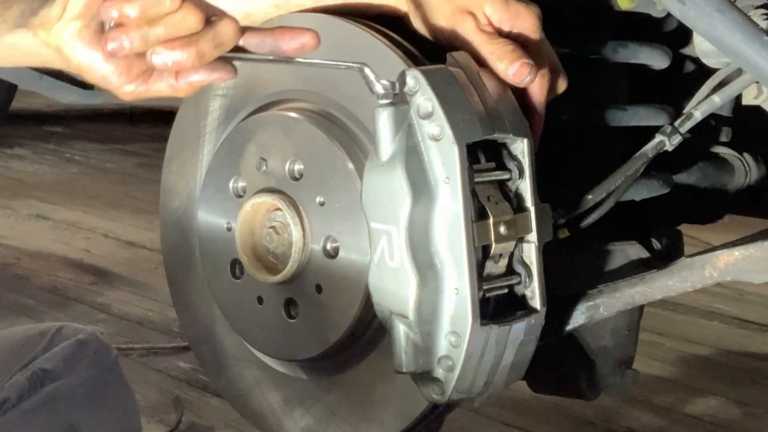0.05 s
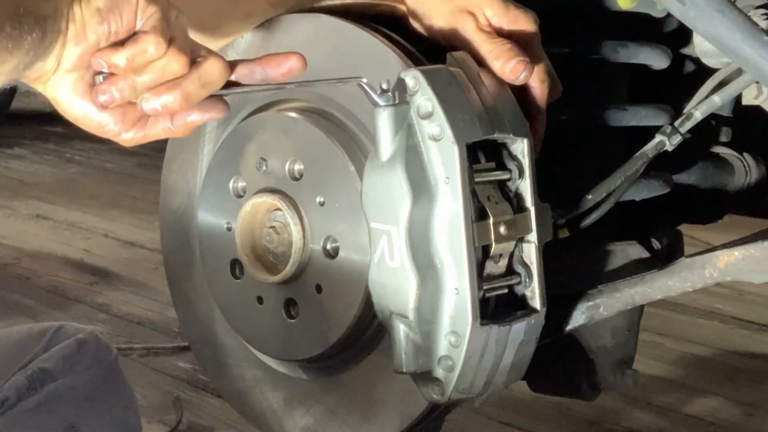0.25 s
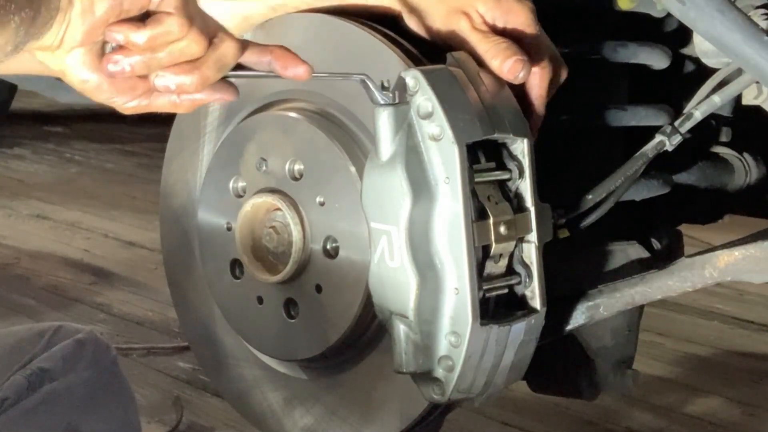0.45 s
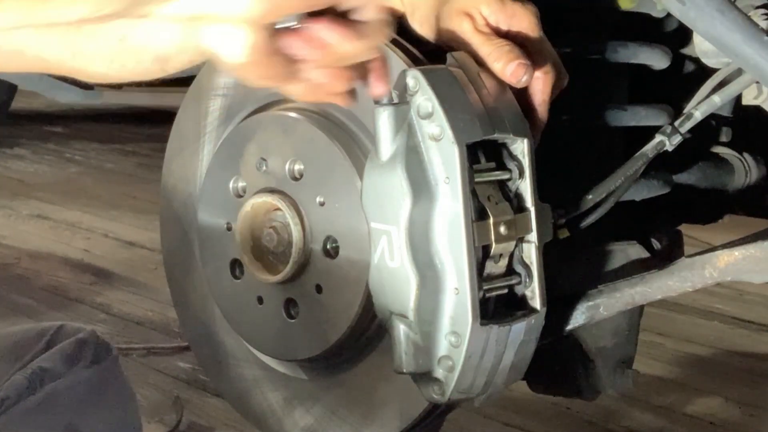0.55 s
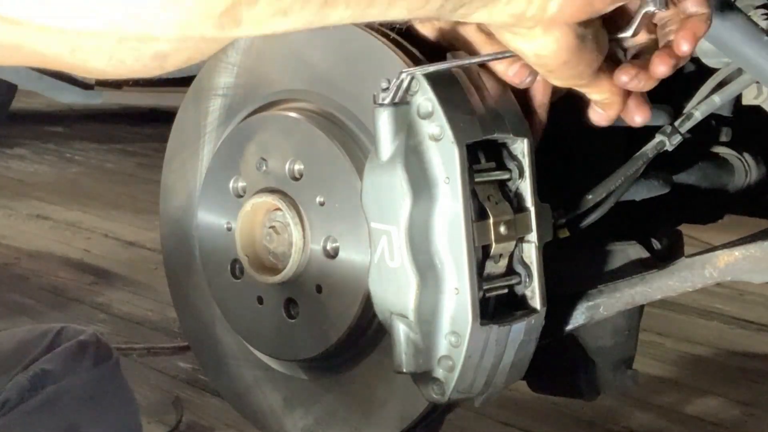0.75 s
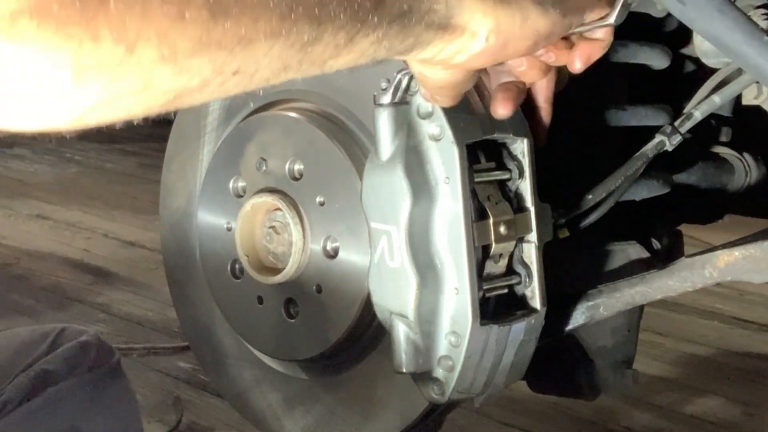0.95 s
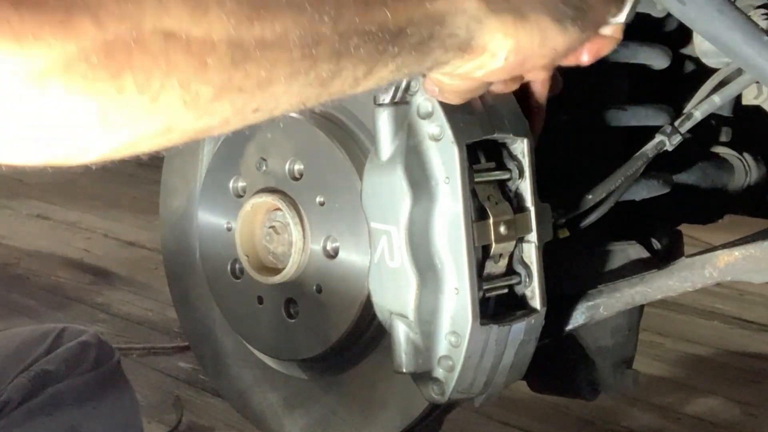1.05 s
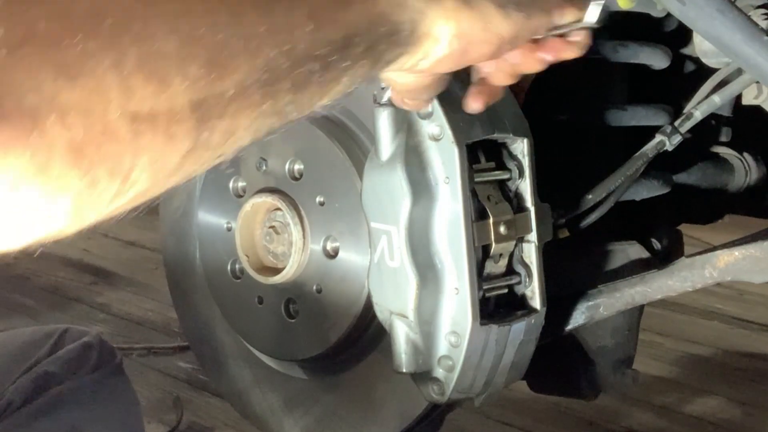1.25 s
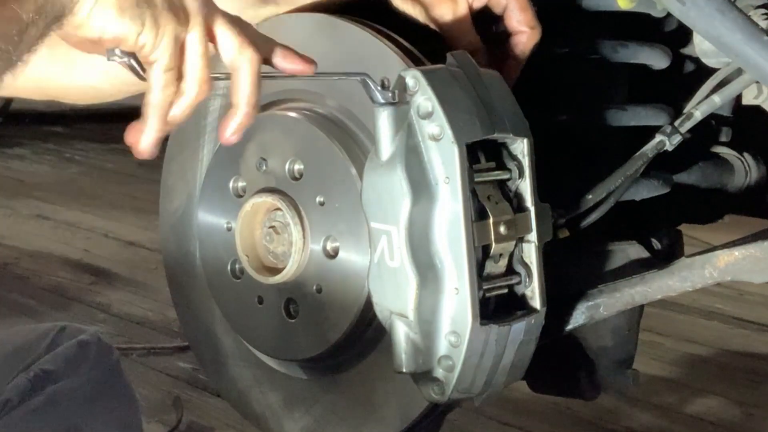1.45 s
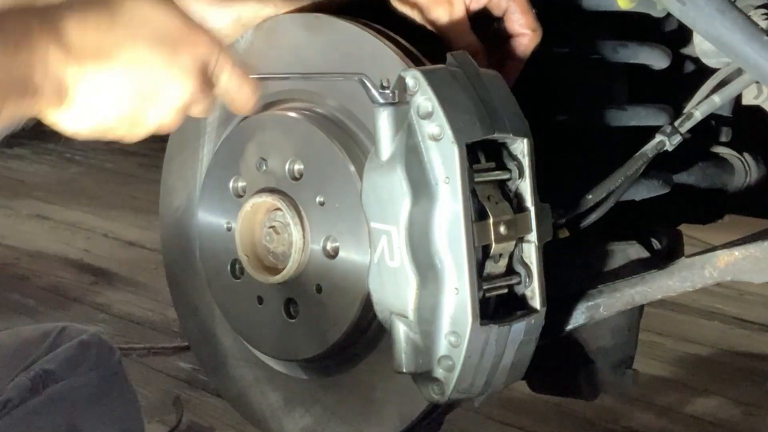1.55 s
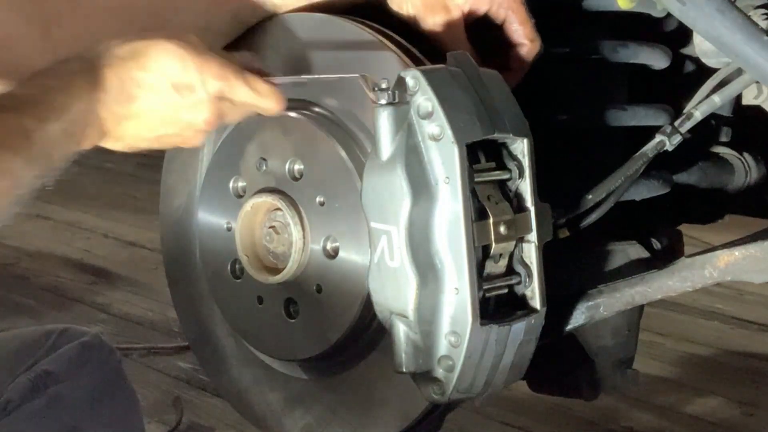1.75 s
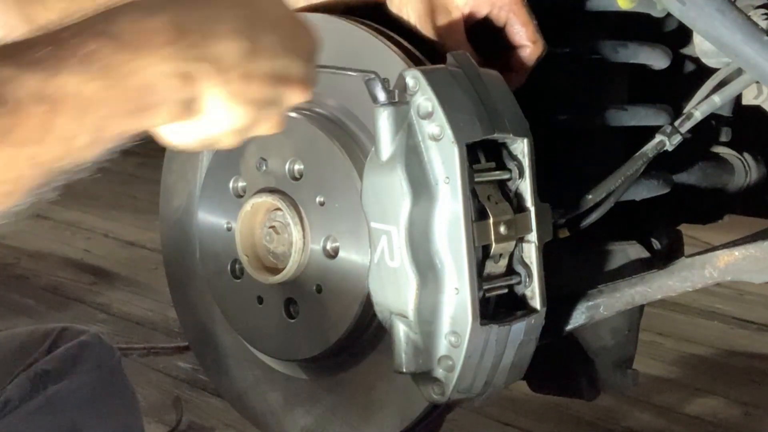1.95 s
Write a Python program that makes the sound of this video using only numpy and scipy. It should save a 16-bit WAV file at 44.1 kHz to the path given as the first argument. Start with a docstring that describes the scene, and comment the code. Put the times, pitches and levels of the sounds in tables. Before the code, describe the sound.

A wrench snaps on a brake caliper bolt at 0.23 s: a weak lead-in, a loud dry bright crack and two bounces within milliseconds, with a slight dull knock and short workshop echo. A faint tick precedes it at 0.06 s. Soft ticks follow at 0.32, tiny squeaks at 0.5-0.64, barely audible scrapes at 0.85 and 1.33, and a tick with squeak at 1.78. Low wavering hum, rumble and thin hiss continue throughout.

```python
"""A machine hum over room rumble and thin hiss comes first, then a faint tick of steel close to the microphone.
In a workshop, a steel wrench on a bolt of a car's brake caliper snaps after a weak lead-in and bounces twice.
Light ticks, scrapes and short squeaks surround the snap. Decaying partials and noise make the snap, filtered
noise the touches, uneven stick-slip pulses the squeaks, wavering sines the hum and shaped noise the air.
Arch and workshop echoes follow the wrench; the recorder rounds peaks and limits the band."""
import sys
import numpy as np
from scipy import signal
from scipy.fft import rfft, irfft
from scipy.io import wavfile
from scipy.ndimage import uniform_filter1d

SR = 44100
rng = np.random.default_rng(int(sys.argv[2]) if len(sys.argv) > 2 else 0)


def transcribe(signal):
    """Save signal, clipped to [-1, 1], as a 16-bit WAV file at the path in sys.argv[1]."""
    frames = np.atleast_2d(signal).T
    limited = np.clip(frames, -1, 1)
    pcm = np.round(limited * 32767).astype(np.int16)
    wavfile.write(sys.argv[1], SR, pcm)


N = 88200  # two seconds
T = np.arange(SR // 3) / SR  # time within one wrench sound, s


def amp(db):
    """Decibels to gain."""
    return 10 ** (np.asarray(db) / 20)


def unit(x):
    """Scales to rms 1."""
    return x / np.sqrt(np.mean(x ** 2) + 1e-20)


def read(points, hz):
    """Reads a table on a log-frequency axis."""
    f, value = np.transpose(points)
    return np.interp(np.log(hz + 1), np.log(f + 1), value)


def pan(db):
    """Left and right gains for a left-minus-right level difference in dB."""
    return amp(np.array([[.5], [-.5]]) * db)


def add(mix, start_s, sound):
    """Mixes a stereo sound in at a time, cut off at the end of the mix."""
    part = mix[:, round(start_s * SR):][:, :sound.shape[1]]
    part += sound[:, :part.shape[1]]


def fade(t60, t=T):
    """Exponential decay, falling 60 dB in t60 seconds."""
    return np.exp(-np.log(1000) * t / t60)


def mode(hz, db, t60):
    """One dying partial of struck metal."""
    return amp(db) * fade(t60) * np.cos(2 * np.pi * hz * T)


# Stereo place of the wrench close to the microphone. Each row: frequency in Hz, left minus right in dB.
NEAR_PAN = [(200, -3), (700, -5.5), (2400, -6), (4600, -5.5), (8000, 1), (12000, -1)]


def noise(spectrum):
    """Coloured noise of rms 1 from the place of the wrench, shaped by a table of Hz and dB."""
    hz = np.fft.rfftfreq(len(T), 1 / SR)
    gains = amp(read(spectrum, hz)) * pan(read(NEAR_PAN, hz))
    return unit(irfft(rfft(rng.standard_normal(len(T))) * gains, len(T)))


# Sharp strokes close to the microphone: a weak lead-in, the snap and its double bounce.
# Each row: start in seconds, level in dB, favoured frequency in Hz.
STROKES = [(0.2312, -15, 2200), (0.23285, 0, 2200), (0.23521, -3, 4700), (0.2359, -8, 7500)]
# Ringing of wrench and caliper.
# Each row: frequency in Hz, level in dB before the stroke's own, t60 in seconds, left minus right in dB.
STEEL = [(2060, -22.5, .02, -2), (2310, -29, .016, -2), (2740, -23.5, .02, -2), (3335, -26, .034, -2),
         (4490, -31, .035, -4), (4760, -26, .027, -7), (5220, -28, .026, -6), (5860, -21.5, .02, -7),
         (6250, -24, .022, -3), (6790, -14, .018, -1), (7360, -10, .017, -3), (7700, -12, .019, -5),
         (8055, -13, .022, -1), (10070, -19, .016, 0), (10228, -17.5, .028, 0), (10600, -26, .022, 0),
         (11818, -26, .025, 0), (12700, -29, .018, 0), (13170, -29, .02, 0), (13960, -19.5, .02, 0),
         (14130, -22, .018, 0)]
# Colour of the dry crack of each stroke. Each row: frequency in Hz, relative level in dB.
CRACK = [(1700, -25), (2100, 3), (2500, -6.5), (3300, -8.5), (3900, -21), (4700, -4.5), (6400, 2),
         (7400, 10), (8200, 1.5), (9000, -7), (10200, 1), (11200, -6), (14000, 1), (15400, -12),
         (16000, -29)]
# Colour of the dull knock of the heavy caliper as the wrench lands.
# Each row: frequency in Hz, relative level in dB.
KNOCK = [(100, -35), (330, 4), (520, -8), (730, 9), (930, -6), (1400, 2), (1800, -1), (3500, -6),
         (6000, -30)]
CRACK_DB, CRACK_T60_S, ONSET_S = -15, .02, .00025
FAVOUR_DB, FAVOUR_Q = -2, 4
THIN_HZ = 1850  # the slim wrench radiates little below this pitch
KNOCK_S, KNOCK_DB, KNOCK_RISE_S, KNOCK_T60_S = .2348, -31, .004, .045
DISC_HZ, DISC_DB, DISC_T60_S = 1545, -53.5, .35


def snap(ring_db=0):
    """Each stroke cracks and rings the steel in its own colour; the caliper knocks and the disc rings on."""
    out = np.zeros((2, N))
    ring = sum(pan(pan_db) * mode(hz, db + ring_db, t60) for hz, db, t60, pan_db in STEEL)
    thin = signal.butter(5, THIN_HZ, "highpass", fs=SR, output="sos")
    onset = np.minimum(T / ONSET_S, 1)
    for start_s, db, favoured_hz in STROKES:
        crack = amp(CRACK_DB) * noise(CRACK) * fade(CRACK_T60_S)
        stroke = amp(db) * signal.sosfilt(thin, onset * (ring + crack))
        favoured = signal.lfilter(*signal.iirpeak(favoured_hz, FAVOUR_Q, SR), stroke)
        add(out, start_s, stroke + amp(FAVOUR_DB) * favoured)
    knock = noise(KNOCK) * fade(KNOCK_T60_S) * np.minimum(T / KNOCK_RISE_S, 1)
    add(out, KNOCK_S, amp(KNOCK_DB) * knock)
    first_s = STROKES[0][0]
    add(out, first_s, pan(0) * mode(DISC_HZ, DISC_DB, DISC_T60_S))
    return out


# Light touches of the wrench, close by. Each row: start in seconds, level in dB, rise in seconds, t60 in seconds,
# ring frequency in Hz, ring level in dB relative to the touch, brightness in dB per octave.
TOUCHES = [(0.0572, -47.5, .002, .02, 2750, -11, 0), (0.3155, -51, .002, .03, 2750, -6, -2.5),
           (0.322, -54, .003, .04, 3000, -9, -2.5), (0.846, -64, .012, .12, 1580, 6, -5),
           (0.848, -67, .018, .08, 3270, 5, -3), (1.326, -63.5, .008, .08, 3170, -12, 2),
           (1.782, -60, .005, .06, 2300, -6, -3.5)]
# Colour of a touch before its brightness tilt. Each row: frequency in Hz, relative level in dB.
TOUCH = [(300, -1.5), (1400, -14), (2200, -7), (3200, -7.5), (3900, -7.5), (5500, -5), (7500, -4.5),
         (10000, -13.5), (16000, -16.5)]
RING_WIDTH_HZ = 80


def touches():
    """Light ticks and scrapes, each rubbing one resonance into a short ring."""
    out = np.zeros((2, N))
    for start_s, db, rise_s, t60, hz, ring_db, tilt in TOUCHES:
        shape = np.minimum(T / rise_s, 1) * fade(t60, np.maximum(T - rise_s, 0))
        rub = noise([(f, level + tilt * np.log2(f / hz)) for f, level in TOUCH])
        ring = unit(signal.lfilter(*signal.iirpeak(hz, hz / RING_WIDTH_HZ, SR), rub))
        add(out, start_s, amp(db) * shape * (rub + amp(ring_db) * ring))
    return out


# Squeaks of the turning wrench. Each row: start in seconds, length in seconds, starting slip rate in Hz,
# its fall as a fraction, level in dB, body resonance in Hz, resonance width in Hz.
SQUEAKS = [(0.506, 0.049, 689, 0.11, -60, 2470, 900), (0.518, 0.045, 675.5, 0.06, -57.5, 1320, 357),
           (0.59, 0.037, 729, 0.065, -62, 2170, 250), (0.625, 0.017, 984, 0.022, -60, 960, 200),
           (1.778, 0.023, 1060, 0.008, -58.5, 3160, 248)]
# Colour of the dry rubbing in a squeak. Each row: frequency in Hz, relative level in dB.
RUB = [(300, -5), (1600, 9), (2500, -11), (3300, 7.5), (4200, -8), (6000, -5), (16000, -40)]
SQUEAK_JITTER, SQUEAK_PAN_DB = .025, -3  # rms fraction of the slip rate; left minus right
SQUEAK_RUB_DB = -5.5  # relative to the tone


def squeaks():
    """Uneven stick-slip pulses slow slightly and sound through one resonance, with some dry rubbing."""
    out = np.zeros((2, N))
    for start_s, length_s, rate, fall, db, body_hz, width in SQUEAKS:
        progress = np.minimum(T / length_s, 1)
        jitter = unit(uniform_filter1d(rng.standard_normal(len(T)), size=50))
        slip_hz = rate * (1 - fall * progress ** 2) * (1 + SQUEAK_JITTER * jitter)
        turns = np.cumsum(slip_hz) / SR
        tone = 0
        for k in range(1, 5):  # four harmonics
            off_resonance = 2 * (k * rate - body_hz) / width
            tone = tone + np.sin(2 * np.pi * k * turns) / np.hypot(1, off_resonance)
        squeak = pan(SQUEAK_PAN_DB) * unit(tone) + amp(SQUEAK_RUB_DB) * noise(RUB)
        add(out, start_s, amp(db) * np.sin(np.pi * progress) * squeak)
    return out


# How far the direct sound is out of step at the two microphone ports.
# Each row: frequency in Hz, lead of the left in radians.
PORT_PHASE = [(100, 0), (2800, -.4), (3400, -1.2), (4800, -1.4), (5900, -1.6), (6800, -3.0), (7600, -2.6),
              (9200, -2.3), (10300, -1.1), (12000, 0), (15500, 3)]


def ports(x):
    """Direct sound reaches the two microphone ports with a phase difference that varies with frequency."""
    phase = read(PORT_PHASE, np.fft.rfftfreq(N, 1 / SR))
    return irfft(rfft(x) * np.exp(1j * np.array([[.5], [-.5]]) * phase), N)


# Decay of the workshop tail. Each row: frequency in Hz, t60 in seconds.
ROOM_T60 = [(300, .35), (2000, .33), (5000, .3), (8000, .27), (14000, .23)]
# Strength of the workshop tail. Each row: frequency in Hz, level in dB.
ROOM_DB = [(300, -10), (1500, -7), (2100, -15), (2700, -12.5), (3300, -9), (3900, -6), (4700, -11.5),
           (6000, -16.5), (7500, -18), (9000, -18), (10300, -17.5), (12000, -22.5), (14000, -18.5)]
ARCH_DB, ARCH_S = -12.5, .0115  # early echoes from the wheel arch


def echoes(x, size=256):
    """Quick scatter from the wheel arch, then the tail of the workshop, as decaying noise convolved with x."""
    t = np.arange(SR // 2) / SR
    arch, room = rng.standard_normal((2, 2, len(t)))
    arch = arch * (t < ARCH_S) * np.sqrt(t / ARCH_S)
    hz, times, z = signal.stft(room, SR, nperseg=size)
    decay = fade(read(ROOM_T60, hz)[:, None], times)
    energy = (decay ** 2).sum(1, keepdims=True) * size / 2  # frames are half a window apart
    decay *= amp(read(ROOM_DB, hz))[:, None] / np.sqrt(energy)
    tail = signal.istft(z * decay, SR, nperseg=size)[1][:, :len(t)]
    response = tail + amp(ARCH_DB) * arch / np.linalg.norm(arch[0])
    return signal.fftconvolve(x, response, axes=1)[:, :N]


# Wavering hum of a machine behind the wrench. Each row: time in seconds, pitch in Hz, level in dB,
# level of the octave below in dB before the trim HUM_LOW_DB.
HUM = [(0.0, 123.1, -52, -40), (0.13, 122.3, -49, -43.5), (0.23, 122.6, -56.5, -42),
       (0.48, 118.8, -48.5, -40), (0.58, 122.1, -55, -46.5), (0.68, 121.3, -49.5, -54),
       (0.9, 121.9, -51.5, -42.5), (1.02, 116.4, -48.5, -66), (1.08, 118, -46.5, -68),
       (1.11, 117.4, -49.5, -71), (1.32, 120.5, -50, -37.5), (1.36, 119.4, -50, -42.5),
       (1.45, 114.4, -53, -45.5), (1.49, 119.2, -49, -46), (1.79, 123.1, -50.5, -48.5),
       (2.0, 118.5, -54, -53)]
HUM_LOW_DB, HUM_OCTAVE_DB, HUM_PAN_DB = -9, -19, 2.5  # octave above is relative to the main tone


def hum():
    """A low machine tone with the octaves below and above, wavering in pitch and level."""
    s, *columns = np.transpose(HUM)
    hz, db, low_db = (np.interp(np.arange(N) / SR, s, column) for column in columns)
    angle = 2 * np.pi * np.cumsum(hz) / SR
    tone = amp(db) * np.sin(angle)
    tone += amp(low_db + HUM_LOW_DB) * np.sin(angle / 2)
    tone += amp(db + HUM_OCTAVE_DB) * np.sin(2 * angle)
    return pan(HUM_PAN_DB) * np.sqrt(2) * tone  # sine peak from rms level


# Colour of room rumble and hiss. Each row: frequency in Hz, relative level in dB per Hz.
AIR = [(20, -14.5), (50, -3), (90, 1.5), (125, -6.5), (165, -13), (250, -13.5), (410, -13.5), (550, -18),
       (1200, -22.5), (2000, -30), (3200, -34.5), (4300, -41.5), (6500, -35.5), (8500, -39), (10300, -24.5),
       (11200, -35.5), (12400, -30.5), (13500, -35.5), (15500, -36.5)]
# How alike the air is at both sides. Each row: frequency in Hz, left-right likeness from -1 to 1.
AIR_SAME = [(60, 0.99), (130, 0.75), (290, 0.34), (640, 0.054), (3100, -0.11), (7200, -0.68), (9500, -0.25),
            (11500, 1), (13000, 0.84), (15000, -0.78)]
# Stereo lean of the air. Each row: frequency in Hz, left minus right in dB.
AIR_PAN = [(60, -1), (150, 3.5), (400, -.5), (1200, -1), (4000, -4.5), (10000, 0)]
AIR_DB, AIR_PATCH_DB = -49.5, 1.54  # overall rms; rms of the level drift


def air(size=2048):
    """Room rumble and thin hiss with slight drifting patches, built as a random spectrogram."""
    hz = np.fft.rfftfreq(size, 1 / SR)
    a, b, c, d, patches = rng.standard_normal((N // 512 + 5, len(hz), 5)).T
    patches = uniform_filter1d(patches, size=20, axis=0)
    patches = unit(uniform_filter1d(patches, size=6, axis=1))
    same = np.clip(read(AIR_SAME, hz), -1, 1)[:, None]
    left = a + 1j * b
    right = same * left + np.sqrt(1 - same ** 2) * (c + 1j * d)
    level = amp(read(AIR, hz)[:, None] + AIR_PATCH_DB * patches)
    z = np.array([left, right]) * level * pan(read(AIR_PAN, hz))[:, :, None]
    sound = signal.istft(z, nperseg=size, noverlap=size - size // 4)[1][:, :N]
    return amp(AIR_DB) * unit(sound)


SCATTERED_RING_DB = -12  # steel ring in the echoes, relative to the direct ring


def scene():
    """The wrench and its echoes, which carry more crack than ring, over hum and room air."""
    handling = touches() + squeaks()
    direct = ports(snap() + handling)
    reflected = echoes(snap(ring_db=SCATTERED_RING_DB) + handling)
    return direct + reflected + hum() + air()


CEILING, EDGE_HZ = 1.15, 15750  # level where rounding saturates; upper band edge


def record(dry):
    """The recorder rounds the highest peaks with a tanh curve and limits the band with a lowpass."""
    rounded = CEILING * np.tanh(dry / CEILING)
    lowpass = signal.firwin(511, EDGE_HZ, window=("kaiser", 9), fs=SR)
    return signal.oaconvolve(rounded, lowpass[None], "same")


dry = scene()
out = record(dry)
transcribe(out)
```